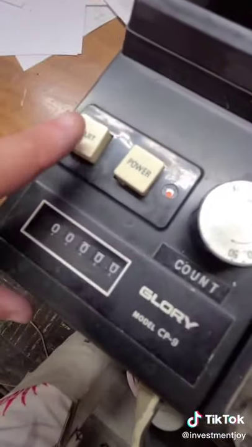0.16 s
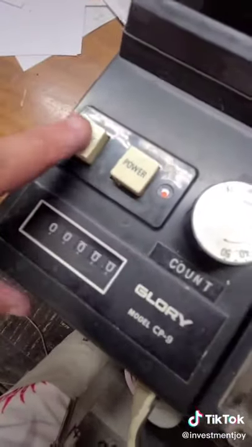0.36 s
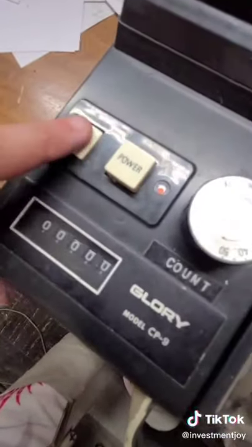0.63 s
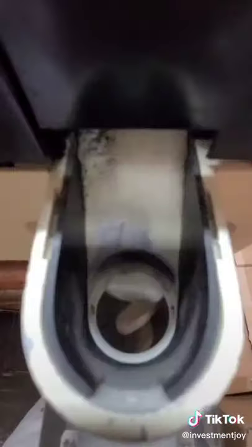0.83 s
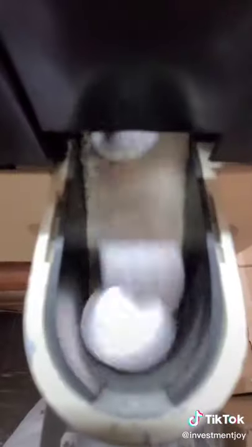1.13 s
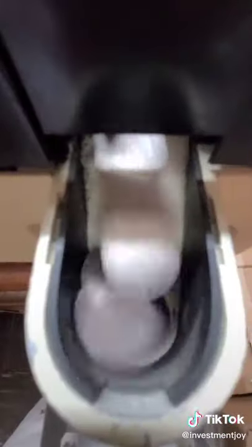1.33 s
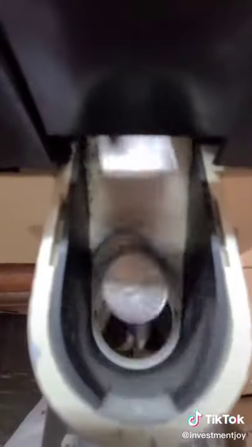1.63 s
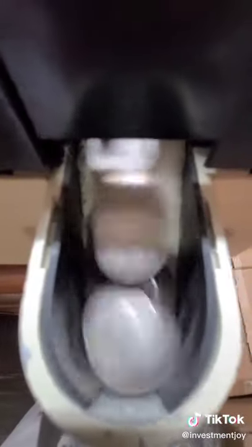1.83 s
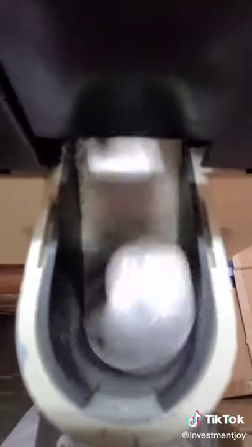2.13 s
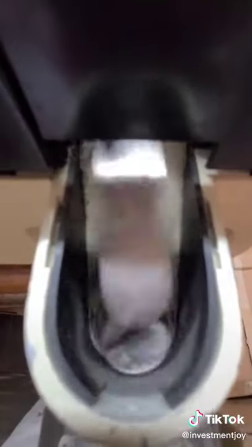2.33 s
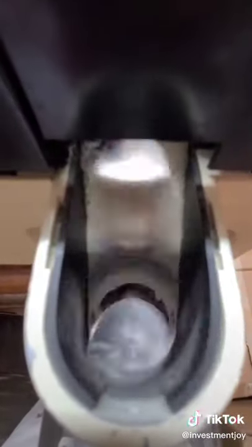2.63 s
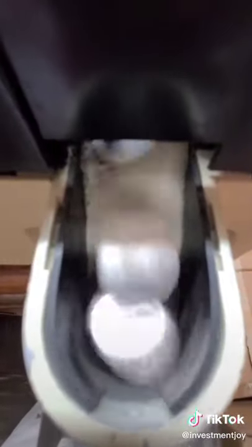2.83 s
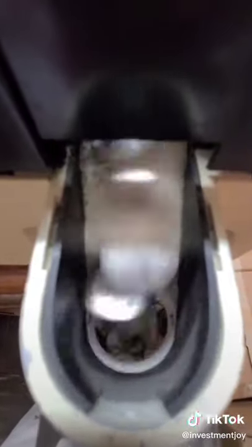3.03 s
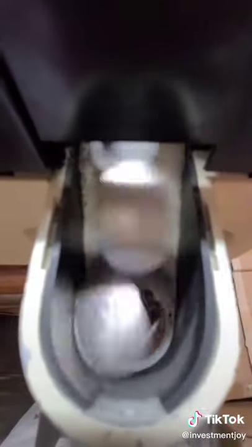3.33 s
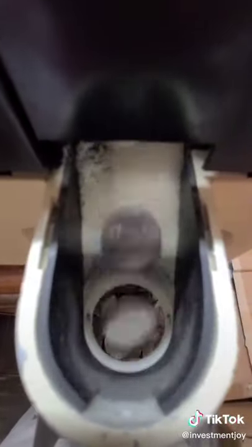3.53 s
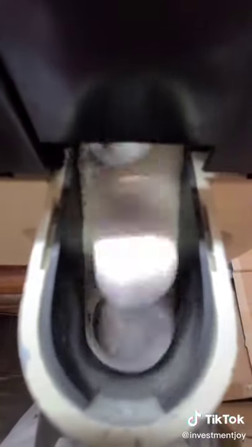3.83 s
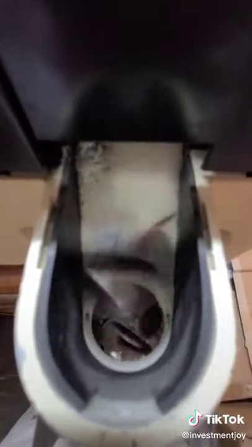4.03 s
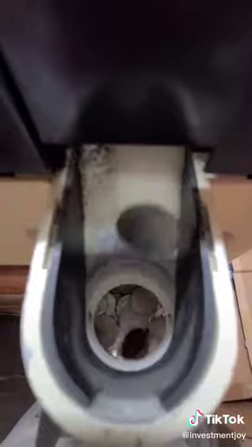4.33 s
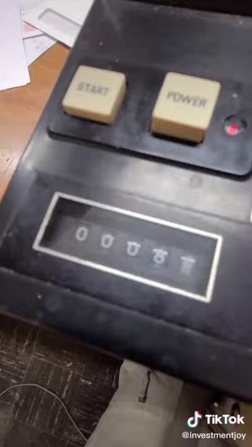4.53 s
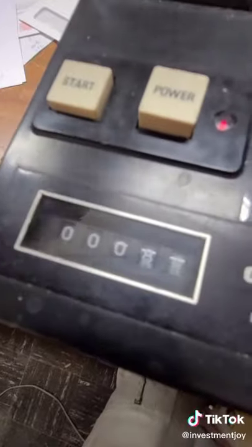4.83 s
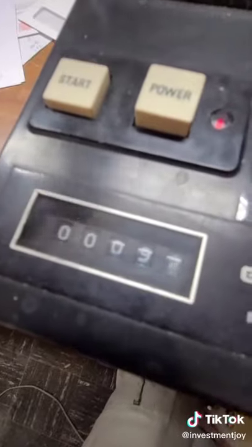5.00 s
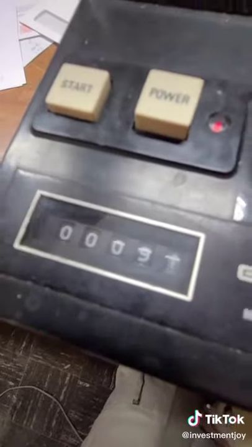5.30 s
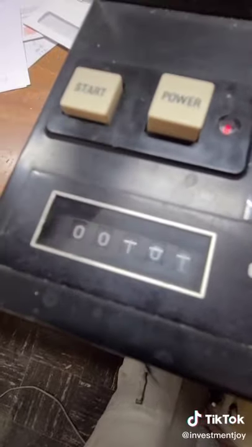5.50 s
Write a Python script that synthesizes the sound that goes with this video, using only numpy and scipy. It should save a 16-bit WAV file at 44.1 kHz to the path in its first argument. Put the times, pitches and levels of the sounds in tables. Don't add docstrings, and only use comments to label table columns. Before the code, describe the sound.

Quiet room tone and mains hum open, broken by tiny key clicks and a solid low snap. Coins on a spinning disc surge into a continuous scraping rattle with high shimmering rings. Near one second the microphone is at the plastic chute: dense knocks and sharp coin-on-coin cracks, gradually less hollow as the bag fills. After about four seconds the view shifts to the housing and the steady jangle runs on, unresolved.

```python
import sys
import numpy as np
from scipy import signal
from scipy.fft import rfft, irfft, next_fast_len
from scipy.io import wavfile
from scipy.ndimage import uniform_filter1d

SR = 44100
rng = np.random.default_rng(int(sys.argv[2]) if len(sys.argv) > 2 else 0)


def bounce(signal):
    frames = np.transpose(np.atleast_2d(signal))
    limited = np.clip(frames, -1, 1)
    pcm = np.round(limited * 32767).astype(np.int16)
    wavfile.write(sys.argv[1], SR, pcm)


def rack_gain(trim_db):
    fader = np.asarray(trim_db, float)
    return 10 ** (fader / 20)


N = 249606
T = np.arange(N) / SR

# centre in seconds, half width in seconds, depth in dB.
CHANGES = [
    (0.7301, 0.0064, -20.5),
    (4.327, 0.0067, -2.5),
]
LEAVE_KEYS_S, LEAVE_CHUTE_S = [s for s, _, _ in CHANGES]
DIP_STEEPNESS = 3
# frequency in Hz, then left and right level in dB
PLACE_COLOURS = [(60.6, -21, -30, -25, -44, -28, -66), (235, -11.5, -8, -22.5, -18, -17, -12.5),
                 (448, -3.5, -5.5, -13.5, -9, -10, -9.5), (920, -0.5, -5, -10.5, -2.5, -0.5, 4),
                 (1530, -8.5, -9, -13.5, -9.5, -11, -12), (2300, -9, -8, -12.5, -10.5, -8.5, -2.5),
                 (3020, -4, -8, -9.5, -7.5, -5.5, -5.5), (4500, -1.5, -8.5, -6.5, -20, -0.5, -3),
                 (6600, -1.5, -7, -5, -12.5, 2, -2), (7300, -3.5, -8, -7, -15.5, -3, 0.5),
                 (9440, 0, -2.5, -3, -8, 0.5, 4.5), (14270, -5, -3, -4.5, -19.5, 1, 6.5)]
# lower mode left and right in dB, upper modes left and right in dB.
RING_EARS = [
    (-5, -20, 0.5, -15),
    (4, -14.5, -3, -70),
    (2.5, 2, -2.5, -1),
]

# time in seconds, jostle in dB, ringing in dB, motor strain in dB.
HEAP = [(0.44, -43.5, -37, -66.5), (0.53, -44.5, -33, -67), (0.76, -47.5, -44, -65.5),
        (0.87, -48, -37, -68), (1.01, -44, -37.5, -60.5), (1.5, -46, -33.5, -69), (1.7, -47, -33, -68.5),
        (2.3, -44, -33.5, -64.5), (2.75, -43, -33.5, -60.5), (3.1, -43, -31.5, -62),
        (3.35, -46.5, -31.5, -71), (3.62, -45, -35, -58), (3.95, -47, -32.5, -69),
        (4.25, -48, -39.5, -78.5), (4.4, -50.5, -48, -60), (4.97, -53, -40.5, -66.5),
        (5.099, -49, -39, -62.5), (5.27, -50.5, -56, -57.5)]
START_S, AT_SPEED_S, SPIN_UP_S = 0.314, 0.465, 0.1
# jostle in dB, ringing in dB, motor in dB.
FROM_REST_DB = (-17, -13, 13)
BOOM_DB, BOOM_FOLLOWS, BOOM_STRAIN = -49.5, 0.15, 0.57
CALM_S, CALM_DB = 0.12, 4
# start in seconds, end in seconds.
LULLS = [(2.15, 2.192), (2.735, 2.753), (3.325, 3.373), (3.768, 3.793), (4.243, 4.309)]
LULL_DB = 3

# frequency in Hz, left in dB, right in dB, T60 in seconds,
# lag of the right ear in radians.
CHUTE = [(606, -10.5, -9, 0.072, 0.25), (955, -67, -11, 0.027, 2.8), (1264, -8, -14, 0.38, 3.7),
         (1513, -18, -6.5, 0.13, 4.2), (1712, -53, -6.5, 0.053, 2.56), (2264, -55, -14.5, 0.094, 2.48),
         (2735, -19.5, -20, 0.19, 0.28), (3660, -20.5, -17, 0.68, 2.5), (4670, -19, -12, 0.29, 2.5)]
# frequency in Hz, width in Hz, level in dB.
HOPPER = [(435, 25, -10), (870, 44, -3), (1290, 130, 1.5), (1790, 44, 7), (2460, 150, 2), (2784, 9, 6),
          (3780, 51, -6), (4960, 147, -26)]
# frequency in Hz, spread between coins in Hz, level in dB, T60 in seconds.
COIN_MODES = [(9220, 146, -5.5, 0.08), (15100, 117, 3.5, 0.066), (15200, 120, 8, 0.063)]
# time in seconds, pitch of the push in Hz, chute ring in dB.
BAG = [
    (0.75, 606, 20),
    (2.2, 670, 16.5),
    (2.5, 850, 13.5),
    (4.2, 780, 6),
    (4.4, 634, 21),
    (4.8, 830, 13),
]

# time in seconds, knock in dB, crack in dB, upper
# ring in dB over the crack; the two tables below share these columns.
HOPPER_LANDINGS = [
    (0.410, -62, -27, -6),
    (0.514, -59.5, -23, -10),
    (0.615, -40.5, -27.5, -14),
    (0.655, -41, -29.5, -17),
    (0.7185, -33.5, -19, -17),
]
# seconds, knock dB, crack dB, upper ring dB over crack.
CHUTE_LANDINGS = [(0.7469, -26, -21, -18.5), (0.814, -30, -15, -18), (0.848, -31, -17.5, -8),
                  (0.887, -29, -24, -2), (1.045, -32, -22.5, -6), (1.125, -28.5, -20, -25),
                  (1.136, -31.5, -22.5, -18), (1.19, -25.5, -22.5, 0), (1.27, -42.5, -29, 3),
                  (1.296, -36.5, -24, -16), (1.357, -26.5, -22.5, -26), (1.388, -39, -26.5, -18),
                  (1.413, -36.5, -22, -14), (1.442, -36, -21.5, -17.5), (1.465, -37, -28, -15),
                  (1.498, -33, -23.5, -8), (1.519, -35.5, -30, -17), (1.552, -37.5, -27, -14),
                  (1.675, -31.5, -24, -14), (1.776, -57, -31, -16), (1.805, -37, -27, -22.5),
                  (1.828, -35.5, -21.5, -18), (1.857, -37.5, -25, -18), (1.877, -31, -24, -16),
                  (1.968, -38, -26, -7), (2.03, -34.5, -27, 1), (2.060, -37.5, -22, 1),
                  (2.194, -36, -27.5, -2), (2.232, -29.5, -24, -18.5), (2.283, -33, -19, -15),
                  (2.393, -36, -32, -1), (2.417, -30.5, -26, -11), (2.485, -40, -31.5, -1),
                    (2.5942, -29.5, -25, -1), (2.646, -40.5, -37, -4), (2.7556, -26.5, -24, -19),
                    (2.7635, -33, -27, -19), (2.787, -32.5, -26, -7), (2.856, -37, -28, -10),
                    (2.883, -35.5, -31, -9), (2.916, -38, -35, -10), (3.075, -31, -31, -8),
                    (3.184, -34.5, -49, -5), (3.226, -32, -27, -11.5), (3.249, -40, -29.5, -2),
                    (3.375, -29.5, -27.5, -5), (3.455, -43, -26.5, -8), (3.531, -29, -24, -18),
                    (3.623, -40, -51, 8), (3.644, -29, -23, -11), (3.757, -44, -55, 8.5),
                    (3.794, -32.5, -34, -5), (3.801, -39, -23, -3), (3.845, -53, -24.5, -9),
                    (3.896, -29, -23, -2), (3.977, -34, -31, 3), (4.037, -32.5, -27.5, -15),
                    (4.064, -36.5, -26, 3), (4.143, -49, -41, -10.5), (4.157, -24.5, -26, -8),
                    (4.312, -40, -35, 5)]
# seconds, knock dB, crack dB, upper ring dB over crack.
COUNTER_LANDINGS = [(4.331, -59, -43, -8), (4.435, -37.5, -37, -20), (4.484, -53, -33, -19),
                    (4.495, -34.5, -30.5, -25), (4.576, -47, -28, -4), (4.624, -45.5, -26.5, -13),
                    (4.659, -43, -26.5, -5), (4.767, -36, -31, -12), (4.779, -54, -28.5, -1),
                    (4.856, -38.5, -35, -14), (4.922, -40.5, -34.5, 1), (5.024, -58, -30.5, -12),
                    (5.053, -45, -39, -10), (5.080, -44, -25.5, -10), (5.158, -53, -30, -8),
                    (5.29, -35.5, -35, -5), (5.318, -43.5, -25.5, -12), (5.373, -33, -30, -19),
                    (5.437, -44.5, -27, -2), (5.524, -37, -28, -6), (5.565, -36.5, -33, 2),
                    (5.629, -36.5, -34, -34.5)]
LANDINGS = HOPPER_LANDINGS + CHUTE_LANDINGS + COUNTER_LANDINGS
SQUARE_S, GLANCING_S = 0.0004, 0.003
LUCK_DB, DETUNE = 3, 0.012
CRACK_LAG_S, LOWER_RING_DB, LOWER_SPREAD_DB = 0.001, -11, -10.5
CHATTER_PER_S = 330

# time in seconds, level in dB, chink in Hz.
EDGE_HITS = [(0.9967, -35, 1590), (2.7074, -34, 10100), (1.1354, -21, 5150), (1.191, -17.5, 1670),
             (1.4405, -26, 5000), (1.5976, -35, 6300), (1.6532, -30.5, 3400), (1.687, -28, 5350),
             (1.778, -27, 8500), (1.8086, -24, 5300), (1.837, -27, 4700), (1.9418, -29, 5070),
             (1.971, -23, 6900), (2.119, -26, 10900), (2.103, -29, 4120), (2.242, -18, 5230),
             (2.292, -23, 5400), (2.3123, -26, 1600), (2.4177, -25, 5300), (2.4504, -19, 4960),
             (2.487, -37, 1590), (2.3592, -29, 11100), (4.576, -33, 11900), (2.807, -28, 5100),
             (2.858, -24.5, 5500), (2.883, -26, 4500), (2.9177, -24, 4380), (3.063, -29, 3200),
             (3.119, -29, 11500), (3.385, -24, 5000), (3.5435, -29, 5000), (3.5606, -31, 8400),
             (3.666, -24.5, 3820), (3.7355, -27, 6760), (3.844, -31, 3500), (3.903, -25, 4730),
             (3.9252, -27, 5000), (3.9797, -28, 2740), (3.8353, -39, 11500), (4.117, -33, 9700),
             (4.142, -33, 6900), (4.2426, -40, 5300), (4.3324, -32.5, 8050), (4.484, -33, 8200),
             (4.495, -33, 5400), (4.745, -39, 5430), (4.857, -32, 5000), (4.928, -30.5, 9150),
             (4.209, -33, 11500), (5.027, -34, 6600), (1.3245, -30, 11600)]
EDGE_DB = 13.5
# time in seconds, frequency in Hz, level in dB.
LOW_RINGS = [(0.741, 9330, -47), (0.853, 9370, -43), (0.897, 9450, -45), (0.973, 9390, -45),
             (1.096, 9300, -43), (1.136, 9440, -46), (1.218, 9350, -42), (1.266, 9320, -46),
             (1.3, 9310, -45), (1.406, 8810, -45), (1.408, 9400, -41), (1.5, 9300, -44), (1.5, 9420, -44),
             (1.599, 9190, -42), (1.655, 9010, -44), (1.657, 9440, -43), (1.657, 9570, -45),
             (1.771, 9100, -43), (1.771, 9450, -42), (1.791, 9220, -43), (2.1, 9440, -40),
             (2.769, 9410, -38), (2.882, 9280, -43), (2.914, 9320, -43), (3.07, 9290, -44),
             (3.102, 9310, -41), (3.184, 9220, -44), (3.457, 9520, -45), (3.597, 9090, -44),
             (3.635, 9110, -43), (3.818, 9300, -45), (3.838, 9090, -44), (3.846, 9320, -43),
             (3.91, 9170, -40), (3.91, 9350, -46), (3.98, 9040, -43), (4.108, 9390, -48),
             (4.136, 9070, -46), (4.599, 9460, -47), (4.682, 9540, -46)]
# time in seconds, level in dB, frequency in Hz.
HIGH_RINGS = [(0.8097, -33, 14900), (1.0446, -25, 15100), (1.097, -31, 15200), (1.124, -38, 15200),
              (1.276, -27, 15400), (1.4662, -32, 15400), (1.497, -27, 14800), (1.55, -33, 15200),
              (1.6562, -26, 15440), (1.7111, -23, 15200), (1.772, -34, 15400), (1.9785, -24, 15100),
              (2.0359, -26, 15100), (2.0593, -26, 15500), (2.1406, -25, 15100), (2.2833, -32, 15200),
              (2.4105, -23, 15200), (2.4918, -27, 15300), (2.5926, -29, 15300), (2.6166, -21, 15200),
              (2.7567, -38, 15300), (2.8136, -29, 15200), (2.9144, -31, 15300), (2.9633, -36, 15300),
              (3.0815, -25, 15200), (3.1848, -23, 15300), (3.3733, -34, 15300), (3.4542, -28, 15500),
              (3.5305, -37, 15300), (3.5514, -35, 15300), (3.622, -22, 15300), (3.6792, -20, 15330),
              (3.755, -21, 15300), (3.8029, -25, 15300), (3.8533, -23, 15300), (3.9036, -22, 15400),
              (3.9745, -24, 15300), (4.0608, -31, 15500), (4.1626, -29, 15340), (4.2074, -29, 15400),
              (4.3396, -31, 15300), (4.5771, -27, 15100), (4.626, -25, 15200), (5.106, -21, 15300),
              (5.29, -28, 15200), (5.3194, -22, 15200), (5.4416, -29, 15200), (5.4776, -25, 15100),
              (5.5245, -25.5, 15500), (5.6247, -28, 15200)]
LOW_RING_DB, LOW_RING_T60 = 11, 0.14
HIGH_RING_DB, HIGH_RING_T60 = 14, 0.066

# time in seconds, peak in dB, frequency in Hz, T60 in seconds, tick in dB.
KEY = [(.108, -61, 2000, .008, -22), (.111, -65, 3080, .008, -25), (.131, -62, 3000, 0.01, -7),
       (.134, -61, 1960, .01, -23.5), (.142, -65, 2300, 0.0087, -25), (.284, -74, 1800, 0.041, 4),
       (0.317, -39, 1690, 0.026, -26), (0.299, -66.5, 4500, 0.034, 18.5), (0.3186, -21, 605, 0.0087, -39.5),
       (.324, -35, 680, 0.029, -81), (0.328, -30.5, 6240, 0.0079, -1), (0.336, -41.5, 243, 0.19, -31.5),
       (0.3212, -45, 960, 0.049, -37)]
# time in seconds, frequency in Hz, level in dB.
TUMBLES = [
    (0.448, 870, -33),
    (0.465, 410, -36),
    (0.54, 1785, -46),
    (0.552, 874, -34.5),
    (0.714, 680, -40),
]
# frequency in Hz, level in dB.
MOTOR = [(25, -22), (42, 3.5), (58, -40), (68, -7), (78, 8), (92, 7), (125, -24), (150, -10), (220, -5),
         (400, -24)]
# frequency in Hz, level in dB per Hz.
ROOM = [(25, -10), (48, 1), (84, -12), (125, -5.5), (250, -12.5), (500, -21.5), (1000, -26), (2000, -36),
        (3500, -47), (6000, -56), (16000, -54)]
ROOM_DB = -63
# frequency in Hz, level in dB.
HUM = (120.5, -64.5)
# frequency in Hz, left-right likeness from 0 to 1.
ALIKE = [(60, 0.9), (290, 0.86), (640, 0.25), (1100, 0), (1400, 0.16), (2200, 0.13)]
# time in seconds, dB relative to the neighbours at which a band is dropped.
THINNING = [(0.7, -4), (0.85, -2.5), (1.5, -2.5), (1.8, -3.4), (4.2, -3.4), (4.35, -1.8), (5.66, -1.8)]
TOP_HZ = 15700


def unit(x):
    return x / np.sqrt(np.mean(x ** 2) + 1e-20)


def along(points, hz):
    f, v = np.transpose(points)
    return np.interp(np.log(hz + 1), np.log(f + 1), v)


def filtered(x, response):
    m = next_fast_len(N + 8192)
    return irfft(rfft(x, m) * response(np.fft.rfftfreq(m, 1 / SR)), m)[..., :N]


def noise(spectrum, patchy_db=0):
    z = signal.stft(rng.standard_normal((2, N)), nperseg=512)[2]
    field = uniform_filter1d(rng.standard_normal(z.shape[1:]), 4, 0)
    field = uniform_filter1d(field, 9, 1)
    pair = signal.istft(z * rack_gain(patchy_db * unit(field)), nperseg=512)[1][:, :N]

    def mid_side(hz):
        turn = np.arccos(np.clip(along(ALIKE, hz), -1, 1)) / 2
        return rack_gain(along(spectrum, hz)) * [np.cos(turn), np.sin(turn)]

    mid, side = filtered(pair, mid_side)
    return unit(np.array([mid + side, mid - side]))


def bursts(strikes, t60):
    return signal.lfilter([1], [1, -rack_gain(-60 / (t60 * SR))], strikes)


def ring(hz, t60, phase, t):
    ears = np.exp(1j * np.reshape(phase, (-1, 1)))
    return (ears * np.exp((2j * np.pi * hz - np.log(1000) / t60) * t)).imag


def resonance(f, hz, width):
    return 1j * f * width / (hz * hz - f * f + 1j * f * width)


def add(track, s, sound):
    part = track[:, round(s * SR):][:, :sound.shape[1]]
    part += sound[:, :part.shape[1]]


def powered(level_db):
    return rack_gain(level_db) * np.clip((T - START_S) / 0.012, 0, 1)


def control(column):
    rows = np.array(HEAP)
    resting = np.clip((AT_SPEED_S - T) / SPIN_UP_S, 0, 1)
    return np.interp(T, rows[:, 0], rows[:, column]) + FROM_REST_DB[column - 1] * resting


def stirred():
    times = np.sort([s for s, *_ in LANDINGS])
    since_s = T - times[np.maximum(np.searchsorted(times, T) - 1, 0)]
    calm = np.clip(since_s / CALM_S, 0, 1) * (T > LEAVE_KEYS_S)
    thin = sum((T > start) * (T < end) for start, end in LULLS)
    return -uniform_filter1d(CALM_DB * (calm - 0.5) + LULL_DB * thin, size=90)


def contacts(per_s, spread_db, t60, scrape):
    hardness = rack_gain(min(spread_db, 7) * np.minimum(rng.exponential(1, N), 2))
    strikes = hardness * (rng.random(N) < per_s / SR)
    steady = scrape * np.where(T < LEAVE_KEYS_S, 1.3, 1)
    return unit(steady + unit(bursts(strikes, t60)))


def ticks():
    hardness = rack_gain(3 * np.minimum(rng.exponential(1, N), 2.4))
    strikes = hardness * (rng.random(N) < 130 / SR)
    return unit(bursts(strikes, 0.0022) * noise([(300, 0), (900, -36.0), (6000, 4.0), (16000, 4.5)]))


def chute_response(f):
    return sum(rack_gain([[left], [right]]) * np.exp([[0], [-1j * lag]]) * resonance(f, hz, 11.6 / t60)
               for hz, left, right, t60, lag in CHUTE)


def hopper_response(f):
    return sum(rack_gain(db) * resonance(f, hz, width) for hz, width, db in HOPPER)


def jostle():
    rattle = contacts(630, 4, 0.048, scrape=0.41)
    rattle = rattle * noise([(500, 0.36), (1500, 14.6), (16000, 5.0)], patchy_db=2.0)
    boom_colour = [(100, -0.5), (450, 4.5), (900, -13.5), (1600, -3.0), (4000, -35.0)]
    boom = contacts(250, 0.61, 0.035, scrape=0.54) * noise(boom_colour, patchy_db=1.5)

    chute_drive = 0.3 * rattle[0] + 0.5 * rattle + 0.01 * boom
    near_chute = rack_gain(-2.0) * unit(filtered(chute_drive, chute_response))
    hopper_drive = rng.standard_normal((2, N)) * contacts(66, 2.0, 0.035, scrape=0.41)
    near_keys = rack_gain(9.5) * unit(filtered(hopper_drive, hopper_response))
    body = np.where(T < LEAVE_KEYS_S, near_keys, near_chute)

    heap_db = control(1)
    boom_db = BOOM_DB + 7.5 + BOOM_FOLLOWS * (heap_db + 45.5) + BOOM_STRAIN * (control(3) + 66)
    boom_db = boom_db - 6 * (T < AT_SPEED_S - SPIN_UP_S / 2)
    heap = rack_gain(11) * rattle + rack_gain(-1.5) * ticks() + body
    return powered(boom_db) * boom + powered(heap_db + stirred()) * heap


def coins():
    crowd, solo, t = np.zeros((2, N)), np.zeros((2, N)), np.arange(SR // 22) / SR
    onset = (1 - np.exp(-t / 0.0074)) * (1 - t / t[-1])
    for s, size in zip(rng.uniform(0.36, N / SR, 1200), np.minimum(rng.exponential(1, 1200), 3)):
        luck = rng.standard_normal((len(COIN_MODES), 4))
        modes = sum(rack_gain(db + 0.64 * k[1]) * ring(hz + spread * k[0], t60, 9 * k[2:], t)
                    for (hz, spread, db, t60), k in zip(COIN_MODES, luck))
        add(crowd, s, rack_gain(0.36 * size) * onset * modes)
    for s, _, crack_db, high_db in LANDINGS:
        luck = rng.standard_normal(7)
        low_db = LOWER_RING_DB + LOWER_SPREAD_DB * luck[6]
        low = rack_gain(low_db) * ring(9320 + 150 * luck[5], 0.015, 9 * luck[:2], t)
        high = rack_gain(high_db) * ring(15290 + 110 * luck[4], 0.12, 9 * luck[2:4], t)
        add(solo, s + CRACK_LAG_S, rack_gain(crack_db + 9.5) * onset * (low + high))
    shimmer = rack_gain(1.5) * powered(control(2) + 0.34 * stirred()) * unit(crowd)
    return shimmer + solo + ringers()


def ringers():
    out, t = np.zeros((2, N)), np.arange(SR // 10) / SR
    high_rings = [(s, hz, db - 6 * (s > LEAVE_CHUTE_S)) for s, db, hz in HIGH_RINGS]
    groups = ((LOW_RINGS, LOW_RING_DB, LOW_RING_T60, 0.004),
              (high_rings, HIGH_RING_DB, HIGH_RING_T60, 0.0035))
    for rows, gain_db, t60, rise_s in groups:
        onset = (1 - np.exp(-t / rise_s)) ** 2 * (1 - t / t[-1])
        for (s, hz, db), k in zip(rows, rng.standard_normal((len(rows), 5))):
            pair = ring(hz, t60, 9 * k[:2], t) + 0.44 * ring(hz + 70 * k[4], t60, 9 * k[2:4], t)
            add(out, s, rack_gain(db + gain_db) * onset * pair)
    return out


def knocks():
    out, t = np.zeros((2, N)), np.arange(SR // 11) / SR
    bag_s, push_hz, ring_db = np.transpose(BAG)
    for s, knock_db, *_ in LANDINGS:
        luck = rng.standard_normal((len(CHUTE), 4))
        click = sum(ring(hz * (1 + 0.12 * k[2]), 0.0045, [0, -1.2], t)
                    for hz, k in zip((1500, 2500, 3500), luck))
        hz = np.interp(s, bag_s, push_hz) * (1 + 0.026 * luck[1, 2])
        push = ring(hz, 0.009, [0, -0.6], t)
        modes = 0
        for (hz, left, right, t60, lag), k in zip(CHUTE, luck):
            phases = k[1] - np.array([0, lag + 0.13 * k[3]])
            ears = rack_gain([[left + LUCK_DB * k[0]], [right + LUCK_DB * k[0]]])
            modes = modes + ears * ring(hz * (1 + DETUNE * k[2]), t60, phases, t)
        modes = rack_gain(np.interp(s, bag_s, ring_db) - 8.5) * modes
        slap = uniform_filter1d(rng.standard_normal((2, len(t))), size=5) * rack_gain(-60 * t / 0.024)
        add(out, s, rack_gain(knock_db) * (rack_gain(10) * click + rack_gain(7) * push + modes + rack_gain(4.5) * slap))
    return out


def cracks():
    out, t = np.zeros((2, N)), np.arange(SR // 11) / SR
    for s, knock_db, crack_db, _ in LANDINGS:
        rise_s = GLANCING_S if knock_db < crack_db - 13 else SQUARE_S
        onset = 1 - np.exp(-t / rise_s)
        chinks = sum(ring(3000 + 11000 * u[0], 0.042, 9 * u[1:], t) for u in rng.random((3, 3)))
        chatter = 0.5 + 0.5 * unit(bursts(rng.random(len(t)) < CHATTER_PER_S / SR, 0.036))
        tail = 0.42 * chatter * rack_gain(-60 * t / 0.42) * (1 - t / t[-1])
        burst = (rack_gain(-60 * t / 0.013) + tail) * rng.standard_normal((2, len(t)))
        add(out, s + CRACK_LAG_S, rack_gain(crack_db + 2.0) * onset * (burst + 0.39 * chinks))
    return out


def edges():
    out, t = np.zeros((2, N)), np.arange(SR // 50) / SR
    onset = 1 - np.exp(-t / SQUARE_S)
    for s, db, hz in EDGE_HITS:
        spit = rack_gain(-60 * t / 0.011) * rng.standard_normal((2, len(t)))
        chink = ring(hz, 0.005, 9 * rng.random(2), t)
        add(out, s, rack_gain(min(db, -27) + EDGE_DB) * onset * (0.65 * spit + chink))
    return out


def key():
    out, t = np.zeros((2, N)), np.arange(SR // 10) / SR
    for s, db, hz, t60, tick_db in KEY:
        tick = rack_gain(tick_db - 60 * t / t60) * rng.standard_normal((2, len(t)))
        add(out, s, rack_gain(db) * (1 - np.exp(-t / 0.00055)) * (ring(hz, t60, 0, t) + tick))
    for s, hz, db in TUMBLES:
        add(out, s, rack_gain(db) * (1 - np.exp(-t / 0.0029)) * ring(hz, 0.076, [0, 0], t))
    return out


def background():
    motor = rack_gain(4.0) * powered(control(3)) * noise(MOTOR, patchy_db=-0.5)
    hum_hz, hum_db = HUM
    hum_gain = rack_gain(hum_db + 4.6 * np.clip((T - START_S) / 0.11, 0, 1))
    hum = hum_gain * np.sqrt(2) * np.sin(2 * np.pi * hum_hz * T)
    turned_down = rack_gain(np.interp(T, [0.62, 0.74], [0, -13]))
    return turned_down * (rack_gain(ROOM_DB) * noise(ROOM) + hum) + motor


def scene():
    machine = jostle() + knocks() + cracks() + edges()
    rings = coins()
    low_rings = filtered(rings, lambda hz: hz < 12000)
    high_rings = rings - low_rings
    table = np.array(PLACE_COLOURS)
    place = np.searchsorted([s for s, _, _ in CHANGES], T)
    out = background() + key()
    for k, ears_db in enumerate(RING_EARS):
        colour = lambda hz: rack_gain([along(table[:, [0, 2 * k + ear]], hz) for ear in (1, 2)])
        heard = rack_gain(ears_db[:2])[:, None] * low_rings + rack_gain(ears_db[2:])[:, None] * high_rings
        out = out + (place == k) * (filtered(machine, colour) + heard)
    dip_db = sum(db * np.clip(DIP_STEEPNESS * (1 - np.abs(T - s) / half), 0, 1)
                  for s, half, db in CHANGES)
    return out * rack_gain(dip_db)


def thinned(x):
    hz, s, z = signal.stft(x, SR, "cosine", nperseg=2048)
    bands = z[:, :1024].reshape(2, 128, 8, -1)
    level_db = 10 * np.log10(np.mean(np.abs(bands) ** 2, axis=(0, 2)) + 1e-20)
    clumps = uniform_filter1d(rng.standard_normal(level_db.shape), size=3, axis=0)
    clumps_db = 1.3 * unit(uniform_filter1d(clumps, size=2, axis=1))
    over_neighbours_db = level_db - uniform_filter1d(level_db, size=7, axis=0)
    weak = over_neighbours_db < np.interp(s, *np.transpose(THINNING)) + clumps_db
    band_hz = hz[:1024:8, None]
    weak &= (band_hz > 2300) & (band_hz < 8300)
    kept = np.pad(np.repeat(~weak, 8, axis=0), ((0, 1), (0, 0)))
    return signal.istft(z * kept, SR, "cosine", nperseg=2048)[1][:, :N]


def band_limit(x):
    return signal.sosfilt(signal.butter(12, 16670, fs=SR, output="sos"), x)


def record(dry):
    limited = filtered(dry, lambda hz: 1 / (1 + (hz / TOP_HZ) ** 300))
    mix = thinned(limited)
    return band_limit(mix)


dry = scene()
out = record(dry)
bounce(out)
```